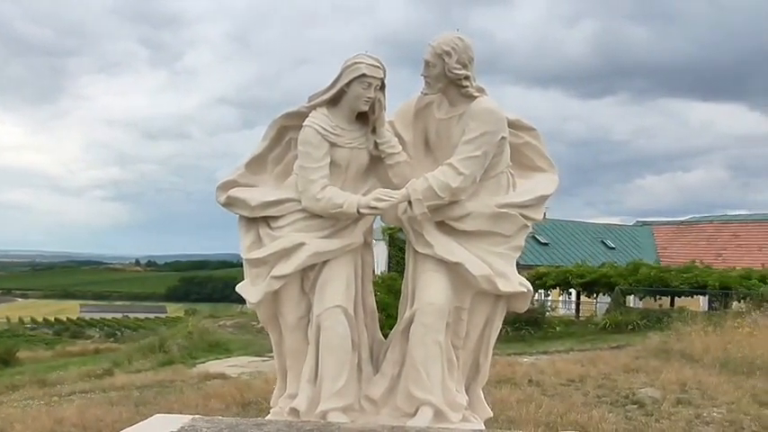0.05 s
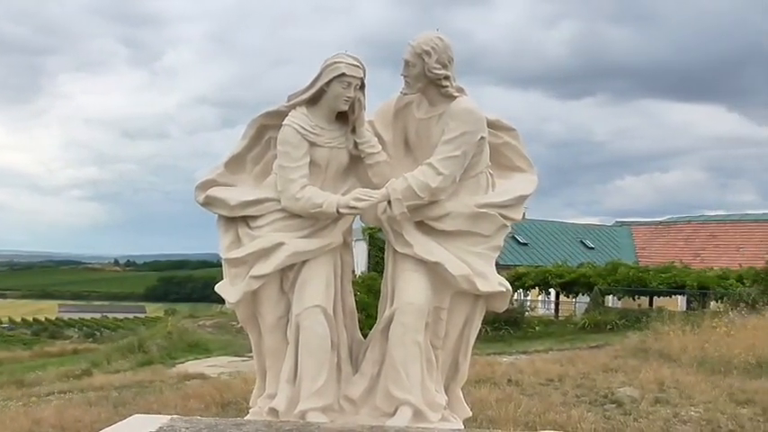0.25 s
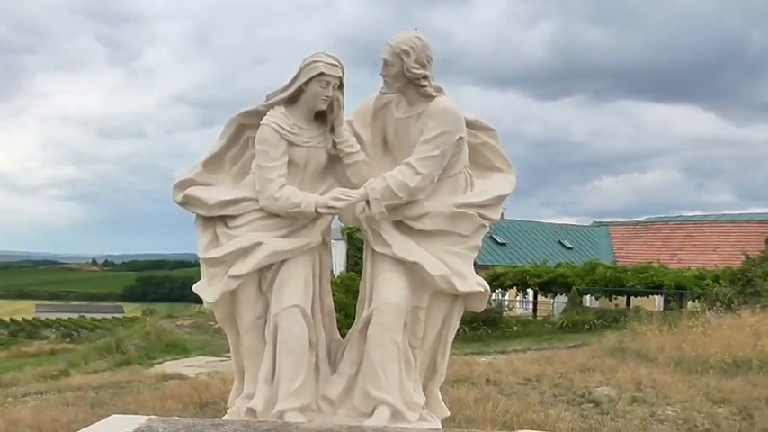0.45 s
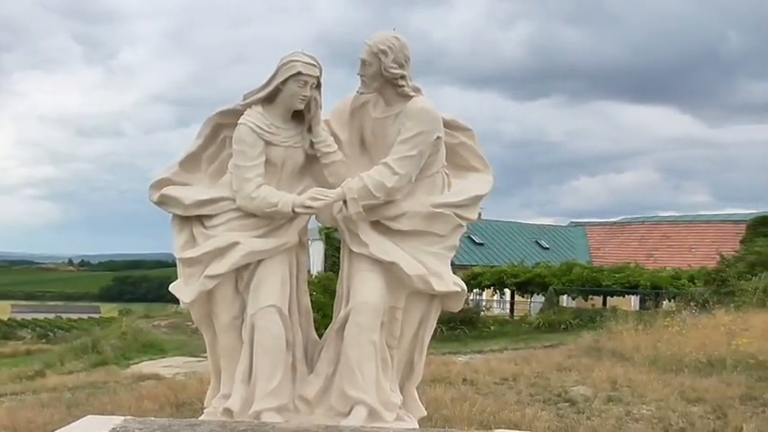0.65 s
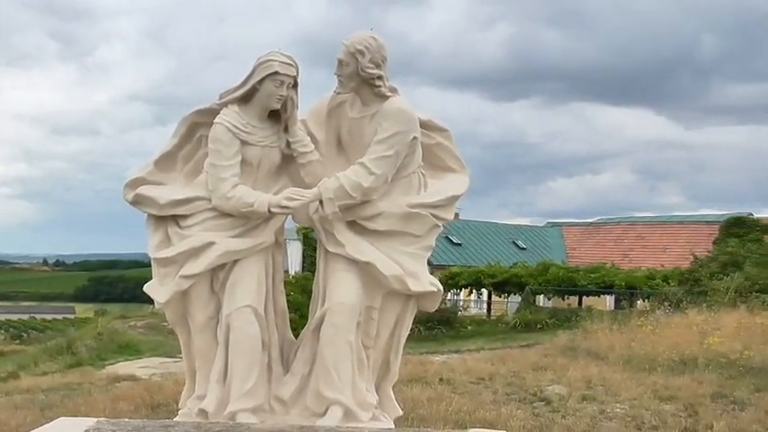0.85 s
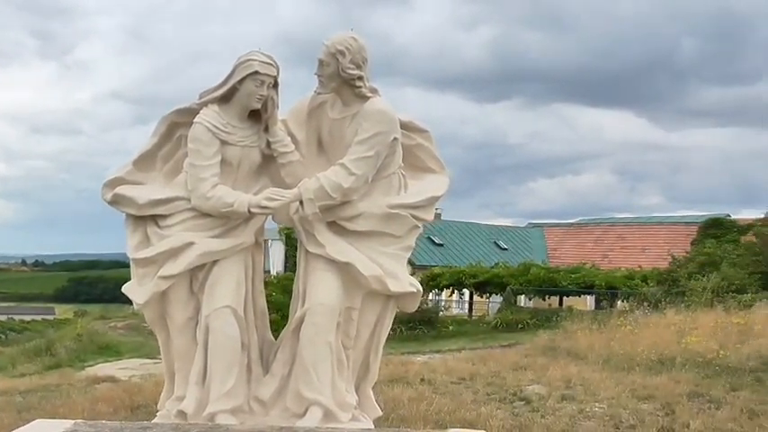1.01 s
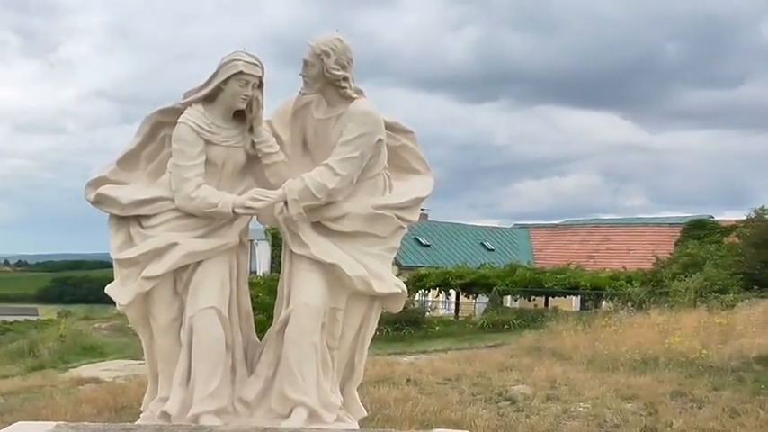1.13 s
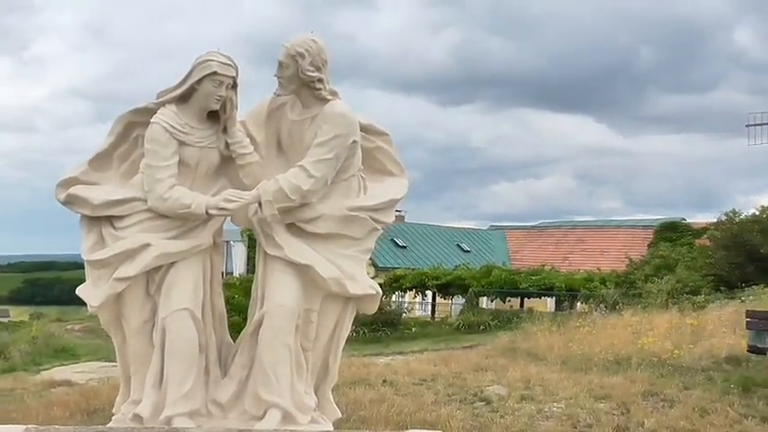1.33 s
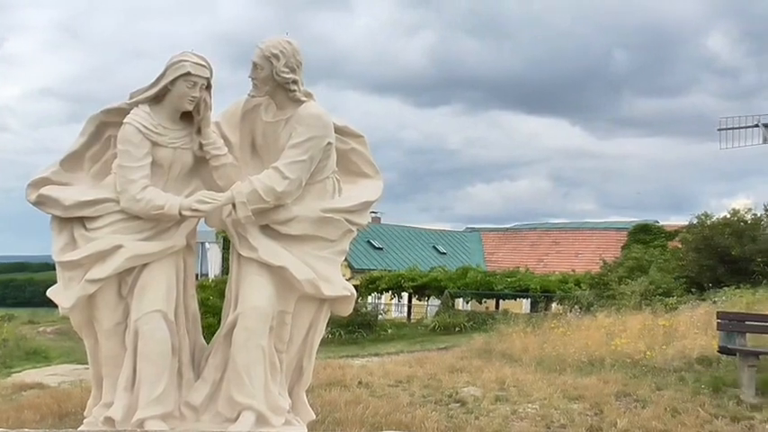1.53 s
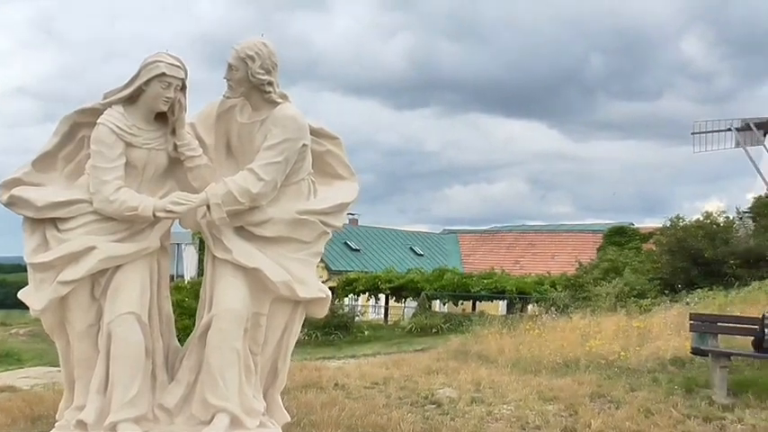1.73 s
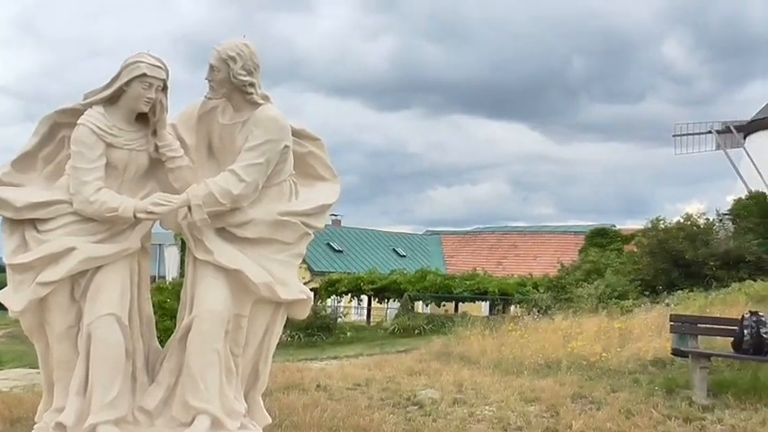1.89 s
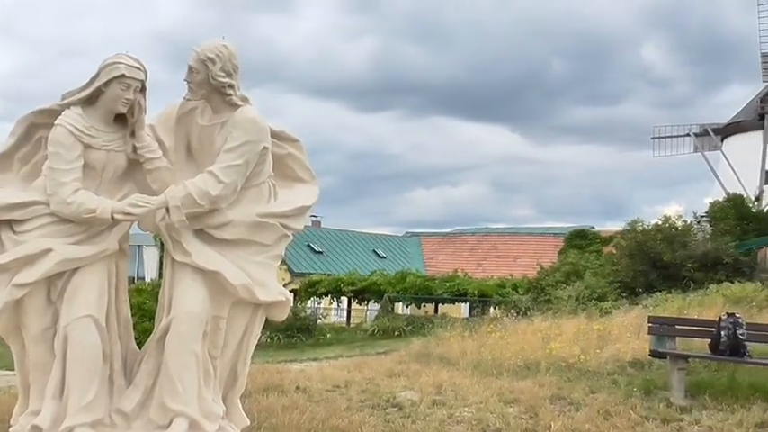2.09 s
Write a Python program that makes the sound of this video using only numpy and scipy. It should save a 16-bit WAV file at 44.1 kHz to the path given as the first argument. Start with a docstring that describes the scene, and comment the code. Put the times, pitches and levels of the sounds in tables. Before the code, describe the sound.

Wind rumbles and flutters on the microphone in irregular gusts over a faint outdoor hiss.

```python
"""Gusty wind rumbles and flutters right on a camera microphone, out on a grassy hillside.
Slow gusts rumble, fast ones tear at the two ports with a rasp, and single eddies thump and pop.
Behind them: a soft rush of wind over the hill, thin hiss, faint far birds, dry grass and one small tick.
The stereo image closes almost to mono early on and opens again after about a second."""
import sys
import numpy as np
from scipy import signal
from scipy.fft import rfft, irfft
from scipy.io import wavfile
from scipy.ndimage import uniform_filter1d, map_coordinates

SR = 44100
rng = np.random.default_rng(int(sys.argv[2]) if len(sys.argv) > 2 else 0)


def generate_wav(signal):
    """Clip the signal to [-1, 1] and save it as 16-bit WAV at the path in sys.argv[1]."""
    frames = np.transpose(np.atleast_2d(signal))
    scaled = np.clip(frames, -1, 1) * 32767
    pcm = np.round(scaled).astype(np.int16)
    wavfile.write(sys.argv[1], SR, pcm)


N = 94815
TIME = np.arange(N) / SR
BAND_LIMIT_HZ = 15700
SIDE = np.array([[1], [-1]])  # adds on the left, subtracts on the right


def amp(db):
    """Decibels to gain."""
    return 10 ** (np.asarray(db) / 20)


def unit_rms(x):
    """Scales to rms 1."""
    return x / np.sqrt(np.mean(x ** 2) + 1e-20)


def over_frequency(points, hz):
    """Reads a table on a log-frequency axis."""
    f, value = np.transpose(points)
    return np.interp(np.log(hz + 1), np.log(f + 1), value)


def over_time(points):
    """Reads a table over time."""
    return np.interp(TIME, *np.transpose(points))


def noise(spectrum):
    """Noise of rms 1 with the given spectral shape, cut an octave above its last point."""
    hz = np.fft.rfftfreq(N, 1 / SR)
    white = rfft(rng.standard_normal(N))
    return unit_rms(irfft(white * amp(over_frequency(spectrum, hz)) * (hz < 2 * spectrum[-1][0]), N))


def smooth(x, hz):
    """Keeps only changes slower than hz."""
    return irfft(rfft(x) * np.exp(-(np.fft.rfftfreq(N, 1 / SR) / hz) ** 2), N)


# Hiss behind everything: f/Hz, relative level/dB
HISS_SPECTRUM = [(500, 5.5), (1200, 6.5), (2000, 3.5), (2800, -4), (3800, -1), (5500, -0.5), (8000, -2),
                 (10000, -4), (12500, -3.5), (15500, -5.5)]
# How alike it is left and right: f/Hz, correlation
HISS_LIKENESS = [(1000, 0.32), (3100, 0.74), (7000, 0.5), (15000, 0.23)]

def hiss(level_db=-60, patchy_db=2.16):
    """Thin, faintly patchy hiss, narrowest near 3 kHz and widening towards the top."""
    hz = np.fft.rfftfreq(1024, 1 / SR)
    a, b, c, d, patches = rng.standard_normal((5, N // 256 + 5, len(hz)))  # frames by frequency bins
    patches = uniform_filter1d(patches, size=8, axis=0)
    patches = unit_rms(uniform_filter1d(patches, size=7, axis=1))
    likeness = over_frequency(HISS_LIKENESS, hz)
    left = a + 1j * b
    right = likeness * left + np.sqrt(1 - likeness ** 2) * (c + 1j * d)
    shape_db = over_frequency(HISS_SPECTRUM, hz) + patchy_db * patches * np.sqrt(2 * hz / BAND_LIMIT_HZ)
    frames = np.array([left, right]) * amp(shape_db)
    sound = signal.istft(frames.transpose(0, 2, 1), nperseg=1024, noverlap=768)[1][:, :N]
    return amp(level_db) * unit_rms(sound)


# Birds far from the microphone: t/s, length/s, mid-chirp f/Hz, fall/share of pitch, level/dB
FAR_CHIRPS = [(0.889, 0.03996, 3583, 0, -66), (1.162, 0.025, 3230, 0.017, -64.5),
              (1.846, .055, 3400, .18, -65.5)]

def birds(unsteadiness=0.016):
    """Short, wavering whistles in the distance, level or falling in pitch."""
    out = np.zeros(N)
    for start, length, hz, fall, db in FAR_CHIRPS:
        progress = np.clip((TIME - start) / length, 0, 1)
        waver = unsteadiness * unit_rms(smooth(rng.standard_normal(N), hz=200))
        pitch = hz * (1 - fall * (progress - .5) + waver)
        out += amp(db) * np.sin(np.pi * progress) * np.sin(2 * np.pi * np.cumsum(pitch) / SR)
    return out


# Wind out on the slope: f/Hz, relative level/dB
HILL_SPECTRUM = [(100, 3), (400, 3), (750, 3.5), (1100, -10), (1600, -23), (2300, -27), (3200, -48),
                 (6000, -57)]
# Its swells: t/s, level/dB
HILL_SWELLS = [(0, -53), (.15, -52), (.6, -52.5), (.8, -43), (.95, -50.5), (1.25, -41.5), (1.35, -46),
               (1.7, -60), (2.0, -44.5), (2.15, -53)]

def hill_wind(side_db=-19):
    """Air rushes softly over the hill, away from the microphone and nearly centred."""
    rush = noise(HILL_SPECTRUM) + amp(side_db) * noise(HILL_SPECTRUM) * SIDE
    return amp(over_time(HILL_SWELLS)) * rush


# Dry grass on the hillside: f/Hz, relative level/dB
GRASS_SPECTRUM = [(1500, -10.5), (3500, -2.5), (6000, 4.5), (9000, -1.5), (12000, -17)]
# Its stirring: t/s, level/dB
GRASS_STIR = [(0, -93), (.25, -71), (.35, -68.5), (.48, -71), (.58, -75), (2.15, -82)]

def grass():
    """Dry grass stirs in the first gusts with a faint, bright swish."""
    return amp(over_time(GRASS_STIR)) * noise(GRASS_SPECTRUM)


# Modes of a small hard object: f/Hz, relative level/dB, t60/s
TICK_RING = [(1790, -4.5, .005), (3520, -4, 0.0095), (3805, -1.5, 0.0092), (5332, -8, 0.0067)]

def tick(start_s=.834, level_db=-39.5):
    """Something small and hard clicks once and rings for a few milliseconds."""
    t = np.maximum(TIME - start_s, 0)
    return sum(amp(level_db + db - 60 * np.minimum(t / t60, 4)) * np.sin(2 * np.pi * hz * t)
               for hz, db, t60 in TICK_RING)


# Low thumps right at the ports: t/s, level/dB, f/Hz, width/cycles
PORT_THUMPS = [(.299, -12.5, 185.4, 0.35), (.361, -14, 193, 0.31), (.399, -11.5, 228, 0.51),
               (.431, -22.5, 330, 0.57), (.482, -6.5, 190, 0.43), (.4985, -7, 192.1, 0.39),
               (.742, -22.5, 237, 1.03), (.815, -7.5, 209.6, 0.5), (.928, -12.5, 241, 0.32),
               (1.474, -17, 283.3, 0.37), (1.4895, -13, 213.9, 0.51), (1.551, -6.5, 210.9, 0.3),
               (1.679, -9, 163.1, 0.87), (1.733, -15.5, 220, 0.64), (1.766, -15.5, 236.7, 0.28),
               (1.8595, -3.5, 287.1, 0.54)]
# Sharper pops, same place: t/s, level/dB, f/Hz, width/cycles
PORT_POPS = [(.431, -27.5, 965, 0.95), (.4815, -25.5, 900, 0.075), (.869, -24.5, 611.7, 1.18),
             (.931, -25.5, 600, .4), (1.016, -30, 1870, 0.97), (1.1025, -13.5, 688.2, 0.24),
             (1.503, -28, 1205, 0.39), (1.68, -27.5, 900, 0.0871), (2.119, -28.5, 1046, .45)]

def eddies(table):
    """Each eddy hits the microphone as a brief suction with an overshoot on either side."""
    out = np.zeros(N)
    for centre, db, hz, width in table:
        cycles = (TIME - centre) * hz
        swing = np.cos(2 * np.pi * cycles) - np.exp(-2 * (np.pi * width) ** 2)  # no net pressure
        out -= amp(db) * swing * np.exp(-.5 * (cycles / width) ** 2)
    return out


# Gusts on the microphone: t/s, length/s, rumble level/dB, flutter level/dB, flutter f/Hz,
# relative rasp level/dB
MIC_GUSTS = [(0.0, 0.0073, -33.5, -30, 170.5, -68), (0.04, 0.025, -34, -31, 289, -63),
             (0.221, 0.028, -36, -30.5, 170.2, -56), (.257, 0.024, -23.5, -20, 170.1, -46.5),
             (0.296, 0.05, -40.5, -27, 189.6, -53), (0.359, 0.011, -21.5, -24.5, 259, -51),
             (.393, 0.013, -22.5, -23.5, 231.9, -46), (.413, 0.023, -36, -26.5, 230.8, -54.5),
             (0.459, 0.017, -25, -21, 218, -48.5), (0.4798, 0.0028, -14.5, -18.5, 300.7, -41.5),
             (0.491, 0.013, -26.5, -20.5, 191, -50.5), (0.507, 0.029, -26.5, -27.5, 189.9, -57.5),
             (0.556, 0.066, -35, -36.5, 168.8, -64), (0.608, 0.07, -30.5, -28.5, 171, -60.5),
             (.702, 0.045, -31.5, -30, 161.3, -63.5), (.826, .054, -26, -22.5, 169.5, -48.5),
             (0.883, 0.045, -38, -29.5, 190.9, -51.5), (.984, .026, -37, -25, 230.7, -37.5),
             (1.008, 0.056, -35, -19.5, 199.9, -33.5), (1.06, 0.032, -24.5, -16.5, 230.2, -33.5),
             (1.098, 0.023, -37, -21.5, 260.4, -35), (1.255, 0.023, -41, -33.5, 200.3, -52),
             (1.386, 0.019, -56, -40.5, 199.7, -48), (1.423, 0.047, -37.5, -39, 219.9, -55.5),
             (1.489, 0.018, -43, -23, 242.5, -38), (1.548, 0.017, -20, -20, 258.6, -33.5),
             (1.58, 0.047, -33, -19, 266.2, -35), (1.647, 0.021, -39.5, -22, 309.8, -46),
             (1.676, 0.01467, -43.5, -20.5, 259.6, -39.5), (1.704, 0.0077, -46, -22.5, 271.1, -43),
             (1.738, .011, -24, -21.5, 280.3, -41.5), (1.768, 0.01233, -22, -21.5, 280.8, -39.5),
             (1.798, 0.046, -33, -31.5, 230.2, -54), (1.828, 0.0191, -39, -25.5, 258.9, -36.5),
             (1.851, 0.02, -44, -19.5, 371.4, -35.5), (1.881, 0.0093, -41.5, -28.5, 257.3, -45.5),
             (1.896, 0.062, -50, -34, 187.4, -55), (2.109, 0.013, -48.5, -28.5, 213.4, -54.5)]
# Breeze on the microphone between them: t/s, flutter level/dB
MIC_BREEZE = [(0, -39.5), (.13, -45.5), (.3, -34), (.7, -43.5), (.78, -38.5), (.95, -39), (1.2, -41),
              (1.35, -41), (1.6, -30), (2.0, -39.5), (2.15, -36.5)]

def gusts(attack_s=0.00261, release_s=.008, breeze_hz=175.7, breeze_rumble_db=-3.5, breeze_rasp_db=-21):
    """Gusts rise, hold and die on top of the breeze: gives rumble, flutter and rasp gains, and pitch."""
    power = amp(over_time(MIC_BREEZE) + np.array([[breeze_rumble_db], [0], [breeze_rasp_db]])) ** 2
    weighted_hz = power[1] * breeze_hz  # the strongest flutter sets the pitch
    for start, length, rumble_db, flutter_db, hz, rasp_db in MIC_GUSTS:
        t = TIME - start
        rise = np.clip(t / attack_s + .5, 0, 1)
        decay = np.exp(-np.clip((t - length) / release_s, 0, 20))
        gust_power = (amp([[rumble_db], [flutter_db], [rasp_db]]) * rise * decay) ** 2
        power += gust_power
        weighted_hz += gust_power[1] * hz
    return np.sqrt(power), weighted_hz / power[1]


def turbulence(spectrum, steady_hz, speed=1, side_db=-13):
    """Eddies carried past both ports: the faster they pass, the higher they sound."""
    place = np.cumsum(speed * np.ones(N)) % (N - 1)
    common, apart = (map_coordinates(noise(spectrum), [place], order=3, mode="wrap") for _ in range(2))
    common /= np.sqrt(abs(smooth(common ** 2, steady_hz)) + 0.012)  # evens out chance swells
    return common + amp(side_db) * apart * SIDE


# Rumble at the ports when the pitch is rumble_ref_hz: f/Hz, relative level/dB
RUMBLE_SPECTRUM = [(10, -23.5), (25, -11.5), (40, -9), (55, 0.5), (90, 1.5), (130, -1.5), (220, -42.5),
                   (500, -66)]
# Flutter at the ports when the pitch is flutter_ref_hz: f/Hz, relative level/dB
FLUTTER_SPECTRUM = [(40, -38), (85, -15.5), (140, -4.5), (220, -2), (310, -7.5), (430, -15), (650, -28),
                    (1100, -38), (2500, -83.5)]
# Rasp at the ports, at any pitch: f/Hz, relative level/dB
RASP_SPECTRUM = [(120, -25.5), (350, 6), (520, 5.5), (760, -3.5), (1300, -7.5), (1750, -20), (2300, -25.5),
                 (2900, -41.5), (4500, -46), (9000, -62)]

def buffeting(rumble_ref_hz=200, flutter_ref_hz=220, rasp_boost_db=5.5, rasp_follows=0.29):
    """Turbulence right on the microphone; the rasp tears hardest on the big pressure swings."""
    (rumble_gain, flutter_gain, rasp_gain), pitch = gusts()
    rumble = turbulence(RUMBLE_SPECTRUM, steady_hz=6.5, speed=pitch / rumble_ref_hz)
    flutter = turbulence(FLUTTER_SPECTRUM, steady_hz=38.8, speed=pitch / flutter_ref_hz)
    tearing = unit_rms(1 - rasp_follows + rasp_follows * flutter[0] ** 2)
    rasp = amp(rasp_boost_db) * tearing * turbulence(RASP_SPECTRUM, steady_hz=40)
    return rumble_gain * rumble + flutter_gain * flutter + rasp_gain * rasp


# Which port takes more wind: t/s, left minus right level/dB
WIND_BALANCE = [(0, 2.5), (.95, 1), (1.1, -1.4), (1.35, 2), (1.5, -3), (1.68, -3), (1.89, -3.5),
                (1.98, 0.8), (2.15, -2.5)]

def scene():
    """The wind leans towards the right port as the camera turns; the background stays centred."""
    lean = amp(over_time(WIND_BALANCE) * SIDE / 2)
    wind = lean * (buffeting() + eddies(PORT_THUMPS) + eddies(PORT_POPS))
    return hiss() + birds() + hill_wind() + grass() + tick() + wind


# Stereo width at the microphone: t/s, side level/dB
STEREO_WIDTH = [(0, -11.5), (.3, -7), (.34, -57), (.94, -44), (1.0, -12), (1.35, -5.5), (1.6, -1.5),
                (2.15, -3.5)]

def record(dry):
    """The image narrows, for a while almost to mono; the recorder's band limit cuts the very top."""
    mid = dry.mean(0)
    narrowed = mid + (dry - mid) * amp(over_time(STEREO_WIDTH))
    lowpass = signal.firwin(511, BAND_LIMIT_HZ, window=("kaiser", 9), fs=SR)
    return signal.oaconvolve(narrowed, lowpass[None], "same")


dry = scene()
out = record(dry)
generate_wav(out)
```